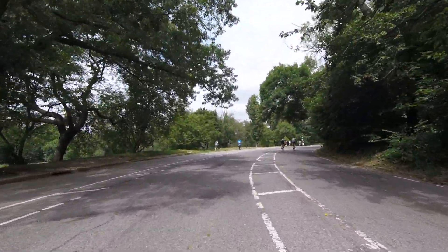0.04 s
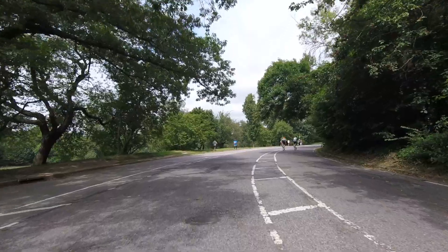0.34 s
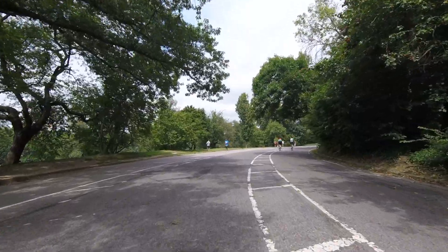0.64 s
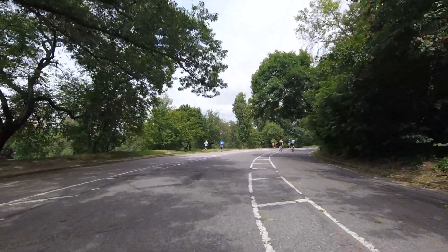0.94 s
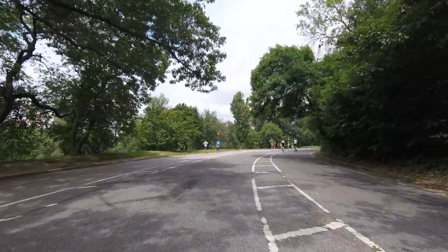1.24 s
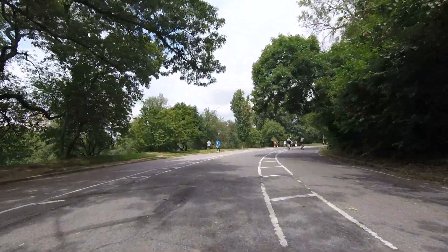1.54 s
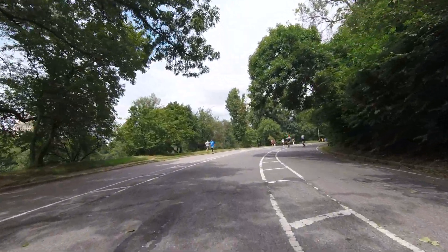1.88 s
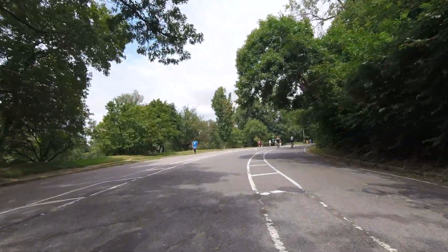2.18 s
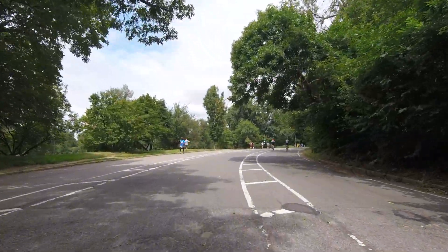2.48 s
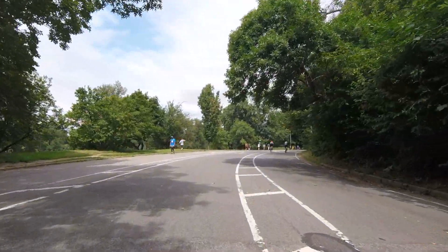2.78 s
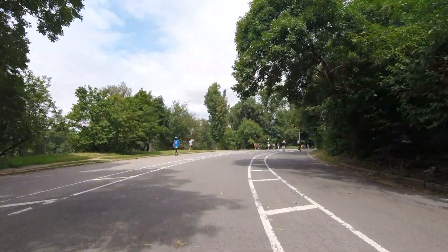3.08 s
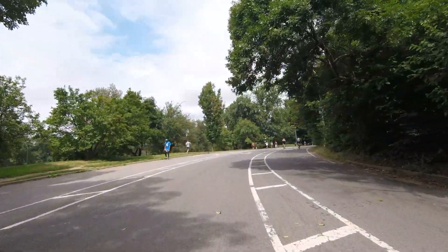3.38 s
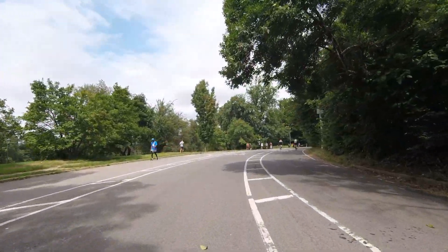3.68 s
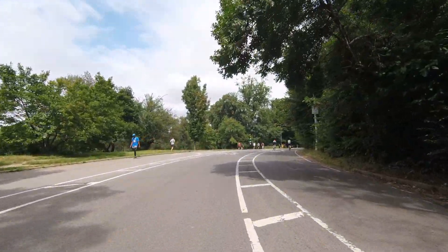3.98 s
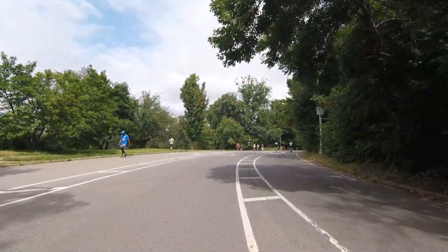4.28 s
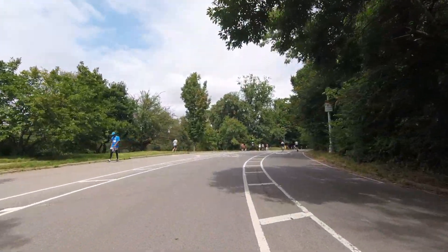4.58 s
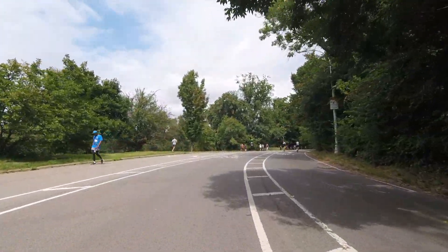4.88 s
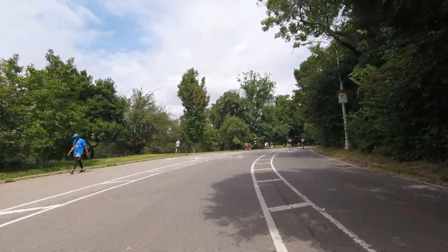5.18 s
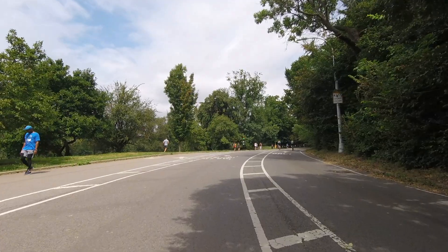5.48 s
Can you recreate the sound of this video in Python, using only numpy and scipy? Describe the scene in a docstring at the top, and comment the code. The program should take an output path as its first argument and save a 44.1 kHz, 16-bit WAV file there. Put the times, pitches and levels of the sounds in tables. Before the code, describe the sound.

Wind buffets the microphone on a moving bicycle in a loud, steady rumble, with rolling tyres and a few light knocks and rattles.

```python
"""A camera rides on a bicycle along a park road. From the start, wind buffets the microphone and sheds a
wavering hum, the road makes the mount drone, the tyres rush and the drive train whirrs in faint swells.
After a second a rough patch sets the housing ticking and the mount knocking; the treble dips briefly
after the hardest knock. Near three seconds a denser rattle ends in a deep bump, then the knocks thin out.
Throughout, a limiter holds the loud rumble steady."""
import sys
import numpy as np
from scipy import signal
from scipy.fft import rfft, irfft
from scipy.io import wavfile
from scipy.ndimage import uniform_filter1d

SR = 44100
rng = np.random.default_rng(int(sys.argv[2]) if len(sys.argv) > 2 else 0)


def int16_out(signal):
    """Quantize to a 16-bit WAV file."""
    q = np.round(np.clip(np.atleast_2d(signal).T, -1, 1) * 32767)
    wavfile.write(sys.argv[1], SR, q.astype(np.int16))


N = 244314


def from_db(db):
    """Decibels to amplitude ratio."""
    return 10 ** (np.asarray(db) / 20)


def rms_one(x):
    """Normalisation to unit power."""
    return x / np.sqrt(np.mean(x ** 2) + 1e-20)


def decay(t, t60_s):
    """Exponential damping: 60 dB down after t60_s."""
    return np.exp(-np.log(1000) * t / t60_s)


def in_time(rows):
    """Linear interpolation of each column of a time curve, at every sample."""
    times, *columns = np.transpose(rows)
    return [np.interp(np.arange(N) / SR, times, column) for column in columns]


def drift(rate_hz):
    """Low-passed noise: a smooth random fluctuation with a spread of 1."""
    hop, settle = 40, 2000
    pole = np.exp(-2 * np.pi * rate_hz * hop / SR)
    noise = rng.standard_normal(N // hop + settle + 2)
    slow = signal.lfilter([1], [1, -2 * pole, pole * pole], noise)[settle:]
    return np.interp(np.arange(N) / hop, np.arange(len(slow)), rms_one(slow))


def coloured(colour):
    """Spectral shaping: steady noise with the given spectrum, at unit power."""
    hz, db = np.transpose(colour)
    bins = np.maximum(np.arange(N // 2 + 1) * SR / N, 1)
    gain = from_db(np.interp(np.log(bins), np.log(hz), db))
    gain *= np.minimum(bins / hz[0], 1) ** 2 * np.minimum(hz[-1] / bins, 1) ** 2   # skirts at both ends
    return rms_one(irfft(rfft(rng.standard_normal(N)) * gain, N))


def resonate(x, hz, width_hz):
    """Two identical resonators in cascade, for steep skirts."""
    r = np.exp(-np.pi * width_hz / SR)
    section = [1 - r, 0, r - 1, 1, -2 * r * np.cos(2 * np.pi * hz / SR), r * r]
    return signal.sosfilt([section, section], x + 1e-18)


def shaken(modes):
    """Random excitation: modes kept ringing by noise, at unit power."""
    return rms_one(sum(from_db(db) * rms_one(resonate(rng.standard_normal(N), hz, width))
                       for hz, width, db in modes))


def steadied(x, span_s):
    """Division by the running RMS evens out slow swells and keeps the fast flutter."""
    power = uniform_filter1d(x ** 2, max(int(span_s * SR), 2))
    return x / np.sqrt(np.abs(power) + 1e-9)


def add(track, start_s, sound):
    """Superposition of a short sound on a track."""
    at = int(start_s * SR)
    track[at:at + len(sound)] += sound[:N - at]


# Resonances of the drive train: pitch_hz, width_hz, level_db
DRIVE_MODES = [(2750, 500, -4), (3380, 460, -2.5), (4440, 420, -8), (4960, 360, -8), (6400, 380, -9),
               (6950, 400, -12)]
# Its swells: middle_s, length_s, level_db, pitch_ratio, tilt_db_per_octave, sing_hz, sing_db
DRIVE_SWELLS = [(0.141, 0.51, -53.5, 0.96, -1.5, 4500, -62.5), (1.92, 0.56, -62.5, 0.95, -1.5, 5150, -73),
                (2.882, 0.4, -64.5, 1.0, 4.5, 4950, -70.5), (3.699, 0.8, -63, 1.06, -3.5, 3445, -71),
                (4.68, 0.61, -67, 1.6, -0.5, 2896, -60.5), (5.369, 0.56, -61, 1.0, 0.5, 3460, -59)]
def drive_train(idle_db, rough_db, sing_width_hz, sag_hz_per_s):
    """Forced resonance: chain and sprockets ring in swells; in each, one narrow band sings and sinks."""
    t = np.arange(N) / SR
    lowest_hz = DRIVE_MODES[0][0]
    whirr = from_db(idle_db) * shaken(DRIVE_MODES)
    for middle_s, length_s, db, ratio, tilt, sing_hz, sing_db in DRIVE_SWELLS:
        modes = [(hz * ratio, width, mode_db + tilt * np.log2(hz / lowest_hz))
                 for hz, width, mode_db in DRIVE_MODES]
        swell = np.exp(-np.pi ** 2 * ((t - middle_s) / length_s) ** 2)
        phase = 2 * np.pi * np.cumsum(sing_hz - sag_hz_per_s * (t - middle_s)) / SR
        sing = drift(sing_width_hz / 2) * np.cos(phase) + drift(sing_width_hz / 2) * np.sin(phase)
        whirr += swell * (from_db(db) * shaken(modes) + from_db(sing_db) * sing)
    return whirr * from_db(rough_db * drift(90))


# Spectrum of air grazing the microphone port: frequency_hz, density_db
SKIM_SPECTRUM = [(700, -8), (950, 3.5), (1120, -3), (1330, -5), (1550, -18.5), (1900, -25), (2600, -39)]
def air_skim(level_db, rough_db, surge_db, follows):
    """Grazing-flow turbulence: a fluttering rush at the port that grows with the pace of the ride."""
    skim_db = level_db + follows * rolling_swing_db()
    return coloured(SKIM_SPECTRUM) * from_db(skim_db + rough_db * drift(80) + surge_db * drift(1.0))


# Loudness of the rolling tyres: time_s, level_db
ROLLING_LEVEL = [(0.0, -22.5), (0.45, -25.5), (1.25, -25.5), (1.6, -27), (1.9, -31), (2.3, -28.5),
                 (2.5, -29), (3.1, -24), (3.72, -27.5), (3.95, -25.5), (4.15, -27), (4.7, -23), (4.98, -26),
                 (5.25, -22), (5.54, -27)]
# Spectra of their rush and their hiss: frequency_hz, density_db
RUSH_SPECTRUM = [(250, -13), (400, 3.5), (520, 1), (690, 4), (860, -0.5), (1100, -17.5), (1500, -30.5),
                 (3000, -49.5), (5000, -65.5)]
HISS_SPECTRUM = [(1200, -7), (2400, -4.5), (3300, 1.5), (4000, -6.5), (4900, -6.5), (5700, -11),
                 (6500, -8.5), (8000, -12), (10500, -16), (11800, -27.5), (13300, -31.5), (15000, -50)]
def tyres(rush_rough_db, hiss_db, hiss_rough_db, hiss_follows):
    """Rolling noise: a dull rush and a faint gritty hiss share one amplitude flutter."""
    roll_db, = in_time(ROLLING_LEVEL)
    flutter = drift(38)
    rush = coloured(RUSH_SPECTRUM) * from_db(roll_db + rush_rough_db * flutter)
    smooth_db = hiss_db + hiss_follows * rolling_swing_db()
    hiss = coloured(HISS_SPECTRUM) * from_db(smooth_db + hiss_rough_db * (flutter + drift(130)))
    return rush, hiss


def rolling_swing_db():
    """Level of the rolling relative to its average; other layers follow a share of it."""
    roll_db, = in_time(ROLLING_LEVEL)
    return roll_db - roll_db.mean()


# Coarse patches under the tyres: start_s, length_s, clatter_db, grit_db
COARSE_PATCHES = [(0.548, 0.11, -25, -64.5), (1.017, 0.18, -29, -55), (1.256, 0.09, -23.5, -61),
                  (2.184, 0.087, -30, -69), (2.506, 0.13, -26.5, -81), (2.655, 0.043, -25, -58),
                  (2.869, 0.13, -25.5, -63), (3.083, 0.073, -26.5, -46.5), (3.146, 0.18, -23, -46),
                  (3.422, 0.073, -22.5, -51), (4.264, 0.09, -27, -70), (4.443, 0.093, -38.5, -52),
                  (4.574, 0.071, -21, -65), (4.957, 0.063, -27.5, -58.5)]
# Spectrum of their clatter: frequency_hz, density_db
CLATTER_SPECTRUM = [(350, -0.5), (550, 7), (800, 6.5), (1150, 1.5), (1400, -11.5), (1900, -29),
                    (2800, -33.5)]
def scuffs(rough_db, grains_per_s):
    """Roughness excitation: coarse asphalt gives a dull clatter, and its grains tick in the housing."""
    clatter_gain, grit_gain = np.zeros((2, N))
    for start_s, length_s, clatter_db, grit_db in COARSE_PATCHES:
        swell = signal.windows.tukey(int(length_s * SR), .75)
        add(clatter_gain, start_s, from_db(clatter_db) * swell)
        add(grit_gain, start_s, from_db(grit_db) * swell)
    coarseness = from_db(rough_db * np.tanh(drift(130)))
    grains = (rng.random(N) < grains_per_s / SR) * rng.uniform(-1, 1, N) * coarseness
    clatter = coloured(CLATTER_SPECTRUM) * coarseness
    return clatter_gain * clatter + grit_gain * rms_one(housing(grains))


# Bumps in the road: start_s, level_db
ROAD_BUMPS = [(1.031, -7.5), (3.186, -11), (3.254, -21), (3.44, -1.5)]
def bumps(hz, t60_s):
    """Damped oscillation: each bump heaves the whole camera through a few slow swings."""
    t, thuds = np.arange(SR // 2) / SR, np.zeros(N)
    for start_s, db in ROAD_BUMPS:
        add(thuds, start_s, from_db(db) * np.sin(2 * np.pi * hz * t) * decay(t, t60_s))
    return thuds


# Resonances of the plastic housing: pitch_hz, width_hz, level_db
PLASTIC_MODES = [(2200, 2600, 8), (3370, 650, 2.5), (4160, 420, -8), (4320, 1500, -10.5), (5250, 1900, -11),
                 (5750, 410, -16), (8200, 400, -30), (10600, 370, -25)]
def housing(force):
    """Modal response of the housing, scaled so that under white noise a mode's width sets no level."""
    return sum(from_db(db) * np.sqrt(SR / width) * resonate(force, hz, width)
               for hz, width, db in PLASTIC_MODES)


# Modes of a loose metal fitting: pitch_hz, level_db, t60_s
METAL_MODES = [(2350, -9.5, 0.028), (2910, -8.5, 0.018), (3600, -1, 0.026), (4080, -5.5, 0.036),
               (4600, -9, 0.016), (5900, -10, 0.029), (6200, -14, 0.019), (8100, -24, .03),
               (10600, -27.5, .04)]
def fitting(t, spread_db=1.0, detune=0.015):
    """Free vibration of the fitting; every touch weights and tunes its modes a little differently."""
    ring = np.zeros(len(t))
    for k, (hz, db, t60_s) in enumerate(METAL_MODES):
        weakening, tuning = rng.standard_normal(2)
        tone = (-1) ** k * np.sin(2 * np.pi * hz * (1 + detune * tuning) * t)
        ring += from_db(db - spread_db * weakening) * tone * decay(t, t60_s)
    return ring


# Contacts of loose parts: start_s, level_db, snap_relative_db, crack_hz, metal_relative_db
CONTACTS = [(0.6306, -43, -38, 3500, -9), (1.029, -44, -36, 3500, -3), (1.037, -36.5, -29, 3336, 3.5),
            (1.0532, -28.5, -34, 2710, -1), (1.0698, -39.5, -26, 3590, 1), (1.0833, -45, -25, 3620, -2.5),
            (1.093, -42, -32, 3700, -4), (1.196, -36, -37, 3020, -5), (1.205, -42, -29, 4200, -7),
            (1.2512, -44.5, -34, 4230, -7), (1.2941, -18, -10.5, 2600, -11), (1.311, -39, -19.5, 2780, -6),
            (1.321, -37, -37, 2625, -4), (1.5262, -30, -20, 5300, -22), (1.593, -52, -44, 3300, -6),
            (1.701, -44, -31, 3700, -15), (1.8583, -30, -16, 5300, -29), (2.0743, -43, -28, 3900, -4),
            (2.138, -32.5, -26, 3700, -1.5), (2.1415, -36, -32, 3000, -2), (2.161, -44, -27, 3800, -9.5),
            (2.2021, -46, -30, 3580, -8), (2.239, -50, -31, 3500, 8.5), (2.364, -50, -25, 4400, -11),
            (2.6655, -38, -36, 2640, -9), (2.673, -43, -34.5, 2900, -9.5), (2.679, -34.5, -32, 3000, -8),
            (2.6914, -39, -35, 3400, -4), (2.7104, -44, -31, 3480, -5), (3.104, -28.5, -31, 3517, -2),
            (3.113, -38, -33, 4200, -6), (3.144, -28, -34, 3720, -2), (3.182, -38, -30, 4200, -7),
            (3.196, -15, -21, 3280, -5), (3.1985, -23.5, -17, 5560, -5), (3.2165, -41, -28, 4000, -2),
            (3.224, -37, -30, 3400, -2), (3.231, -38, -28, 3600, -2), (3.2615, -22, -28, 3570, -2),
            (3.2665, -32, -25, 3580, 0), (3.2795, -42, -34, 3600, -4), (3.291, -40.5, -26, 3800, 1),
            (3.328, -43, -36, 4400, -6), (3.4346, -39.5, -32, 3500, -12), (3.455, -40, -30, 3430, -8),
            (3.5184, -42.5, -34, 3530, -4), (4.147, -48, -42.5, 2300, -27),
            (4.355, -49, -36.5, 3120, -14.5), (4.465, -48, -35, 3200, -14), (4.6211, -47, -36, 3470, -8),
            (4.9728, -45, -35, 3290, -13)]
# Spectrum of a hard contact's snap: frequency_hz, density_db
SNAP_SPECTRUM = [(3500, -18.5), (5200, 2), (7000, -5), (9000, 1.5), (10600, -7.5), (12000, -9.5),
                 (14000, -2), (16000, -19.5)]
def ticks(ring_db, crack_db, snap_db, fitting_db, rise_s, t60_s, crack_width_hz, plastic_top_hz):
    """Impact excitation: a brief pitched chatter rings housing and fitting; hard contacts also snap."""
    t = np.arange(SR // 10) / SR
    contact = (1 - np.exp(-t / rise_s)) * decay(t, t60_s)
    contact /= contact.max()
    force, hard_force, crack, metal = np.zeros((4, N))
    grain, snap = rng.standard_normal(N), coloured(SNAP_SPECTRUM)
    for start_s, db, hard_db, hz, metal_db in CONTACTS:
        add(force, start_s, from_db(db) * contact)
        add(hard_force, start_s, from_db(db + hard_db) * contact)
        chatter = resonate(contact * rng.standard_normal(len(t)), hz, crack_width_hz)
        add(crack, start_s, from_db(db) * chatter / np.abs(chatter).max())
        add(metal, start_s, from_db(db + metal_db) * fitting(t))
    plastic = from_db(ring_db) * housing(force * grain) + from_db(crack_db) * crack
    plastic = signal.sosfilt(signal.butter(4, plastic_top_hz, fs=SR, output="sos"), plastic)
    return plastic + from_db(snap_db) * hard_force * snap + from_db(fitting_db) * metal


# Knocks in the clamp: start_s, level_db, pitch_hz, t60_cycles, edge_relative_db, thud_relative_db
CLAMP_KNOCKS = [(0.661, -23.5, 700, 24, -44, -16), (0.686, -20.5, 800, 24, -43.5, -14),
                (0.909, -23, 800, 22, -42, -15), (1.0295, -15, 1000, 22, -42, -11),
                (1.0375, -14, 880, 26, -35, -13), (1.0522, -5.5, 1070, 15, -22, -8),
                (1.071, -19, 990, 19, -36, -12), (1.082, -20, 1080, 20, -38, -11),
                (1.2938, -5, 850, 12, -18, 1), (1.2964, -10, 1500, 6, -18, -8),
                (1.3105, -0.5, 805, 37, -44, -12), (1.5266, 3.5, 1086, 12, -12, -0.5),
                (1.582, -16, 1176, 31, -30, -6), (1.874, -13, 853, 21, -35, -20),
                (2.137, -12, 1130, 22, -24, -6), (2.227, -17, 730, 24, -37.5, -15.5),
                (3.1065, -7.5, 905, 21, -43, -18), (3.144, -9.5, 860, 18, -42, -14),
                (3.188, -14, 700, 16, -42, -6), (3.195, -7.5, 1437, 29, -14, 2),
                (3.1973, -14, 1870, 21, -20, -6), (3.204, -5, 756, 25, -42, -4),
                (3.21, -8, 620, 13, -42, -16), (3.231, -10, 1020, 33, -40, -10),
                (3.2385, -14, 980, 25, -40, -10), (3.2495, -7.5, 885, 29, -44, -6),
                (3.2622, -9, 1050, 12, -28, -12), (3.2755, -10, 790, 20, -37, -15),
                (3.447, -17, 870, 20, -42, -20), (4.464, -18, 700, 18, -41.5, -12),
                (4.815, -12.5, 750, 40, -49, -16)]
# Modes of the clamp: pitch_ratio, level_db
CLAMP_PARTIALS = [(.65, -5.5), (1, 9), (1.45, -6.5), (1.9, -17)]
def knocks(rise_s, edge_hz, edge_t60_s, thud_hz, thud_t60_s, slack, seat_s):
    """Impact in a loose joint: a sharp edge, a tock that rises as the mount seats, a thud of the body."""
    t, out = np.arange(SR // 10) / SR, np.zeros(N)
    onset = 1 - np.exp(-t / rise_s)
    glide = 1 - slack * np.exp(-t / seat_s)   # pitch rises as the slack is taken up
    phase_per_hz = 2 * np.pi * np.cumsum(glide) / SR
    edge = onset * np.sin(2 * np.pi * edge_hz * t) * decay(t, edge_t60_s)
    thud = onset * np.sin(2 * np.pi * thud_hz * t) * decay(t, thud_t60_s)
    for start_s, db, hz, cycles, edge_db, thud_db in CLAMP_KNOCKS:
        modes = sum((-1) ** k * from_db(mode_db) * np.sin(hz * ratio * phase_per_hz)
                    for k, (ratio, mode_db) in enumerate(CLAMP_PARTIALS))
        tock = onset * decay(t, cycles / hz) * modes
        tock /= np.abs(tock).max()
        add(out, start_s, from_db(db) * (tock + from_db(edge_db) * edge + from_db(thud_db) * thud))
    return out


def treble_dip(depth_db, fall_s, hold_s, recover_s):
    """Gain envelope for the treble, which dips briefly after the hardest knock."""
    hardest_s = max(CLAMP_KNOCKS, key=lambda knock: knock[1])[0]
    corners_s = hardest_s + np.cumsum([0, fall_s, hold_s, recover_s])
    return from_db(np.interp(np.arange(N) / SR, corners_s, [0, depth_db, depth_db, 0]))


# How hard the road sways the mount: time_s, level_db
SWAY_LEVEL = [(0.0, -12), (0.25, -14), (0.6, -12), (1.3, -15), (1.7, -18.5), (1.93, -11.5), (2.12, -16),
              (2.8, -14), (3.15, -10.5), (3.55, -17.5), (4.0, -14.5), (4.8, -11.5), (5.1, -19.5),
              (5.54, -16)]
# Resonances of the mount, low sway and higher drone: pitch_hz, width_hz, level_db
MOUNT_SWAY_MODES = [(106, 27, -3.5), (150, 35, -4.5), (181.6, 43, 0)]
MOUNT_DRONE_MODES = [(236.1, 43.7, 2), (300, 45.7, -3.5), (417.5, 51, -18)]
def mount(drone_db, gust_db_per_doubling, follows, cruise_hz):
    """Forced vibration: asphalt shakes the mount, whose drone grows with the rolling and in gusts."""
    sway_db, = in_time(SWAY_LEVEL)
    shedding_hz, _ = in_time(VORTEX_HUM)
    speed_doublings = np.log2(shedding_hz / cruise_hz)   # cruise_hz is shed at the usual air speed
    swell_db = gust_db_per_doubling * speed_doublings + follows * rolling_swing_db()
    sway = from_db(sway_db) * steadied(shaken(MOUNT_SWAY_MODES), span_s=0.32)
    drone = from_db(drone_db + swell_db) * steadied(shaken(MOUNT_DRONE_MODES), span_s=0.077)
    return sway + drone


# Hum of the eddies shed by the housing: time_s, pitch_hz, level_db
VORTEX_HUM = [(0.0, 205, -12), (0.18, 214, -12.5), (0.32, 214, -16.5), (0.44, 200, -8.5), (0.6, 198, -17),
              (0.76, 238, -14.5), (0.9, 216, -17.5), (1.08, 208, -8), (1.24, 232, -14.5),
              (1.34, 245, -15.5), (1.6, 174, -16.5), (1.85, 195, -29.5), (2.02, 181.6, -15.5),
              (2.38, 193, -13.5), (2.65, 200, -17), (2.8, 160, -12.5), (2.95, 210, -19), (3.19, 243.4, -16),
              (3.37, 219, -20), (3.51, 242.4, -16), (3.65, 196, -12), (4.1, 197, -14.5), (4.3, 192, -13.5),
              (4.52, 198, -12), (4.7, 190, -17), (4.87, 206, -11.5), (5.02, 168, -11), (5.14, 194, -10.5),
              (5.26, 190, -11.5), (5.37, 207, -9.5), (5.54, 192, -11.5)]
# How hard large eddies buffet the port: time_s, level_db
BUFFET_LEVEL = [(0.0, -11), (0.52, -21.5), (0.72, -10), (0.88, -16), (1.08, -16), (1.5, -16), (1.58, -29),
                (1.7, -16.5), (2.2, -19.5), (2.8, -18.5), (3.2, -10), (3.48, -16), (3.7, -19.5), (4.2, -25),
                (4.68, -16), (5.17, -24), (5.3, -16.5), (5.54, -23)]
# Spectrum of the buffeting: frequency_hz, density_db
BUFFET_SPECTRUM = [(15, -9.5), (28, 3), (45, -4.5), (65, 4), (90, -2.5), (140, -0.5), (250, -17),
                   (500, -43)]
def wind(waver_hz, jitter_hz, flutter_db, octave_db):
    """Vortex shedding hums at a pitch proportional to air speed, while large eddies thump on the port."""
    hz, hum_db = in_time(VORTEX_HUM)
    buffet_db, = in_time(BUFFET_LEVEL)
    buffet = from_db(buffet_db) * steadied(coloured(BUFFET_SPECTRUM), span_s=0.12)
    pitch_hz = hz + waver_hz * drift(23.95) + jitter_hz * drift(96.6)
    phase = 2 * np.pi * np.cumsum(pitch_hz) / SR
    hum = rms_one(np.sin(phase) + from_db(octave_db) * np.sin(2 * phase))
    return buffet + hum * from_db(hum_db + flutter_db * drift(13.0))


def scene():
    """Superposition: airborne and structure-borne sound add at one microphone."""
    air = wind(waver_hz=9, jitter_hz=11.95, flutter_db=3.5, octave_db=-27.0)
    air += air_skim(level_db=-36, rough_db=1.7, surge_db=3.5, follows=0.87)
    rush, hiss = tyres(rush_rough_db=0.7, hiss_db=-62.5, hiss_rough_db=1.5, hiss_follows=0.68)
    road = rush + mount(drone_db=-14.5, gust_db_per_doubling=6.5, follows=0.56, cruise_hz=219)
    road += scuffs(rough_db=5, grains_per_s=810) + bumps(hz=34.5, t60_s=0.13)
    whirr = drive_train(idle_db=-75, rough_db=1.5, sing_width_hz=150, sag_hz_per_s=450)
    treble = (hiss + whirr) * treble_dip(depth_db=-19, fall_s=0.018, hold_s=0.05, recover_s=0.065)
    rattle = ticks(ring_db=-20.5, crack_db=-1.0, snap_db=3.0, fitting_db=-2.0,
                   rise_s=0.000099, t60_s=0.012, crack_width_hz=2200, plastic_top_hz=9500)
    rattle += knocks(rise_s=0.00005, edge_hz=2700, edge_t60_s=0.0027,
                     thud_hz=570, thud_t60_s=0.0072, slack=0.3, seat_s=0.00074)
    return (air + road + treble + rattle)[None]


def limiter(x, ceiling_db, release_db_per_s, attack_s):
    """Peak limiting: peaks over the ceiling pull the gain down, and it recovers at a steady rate."""
    over_db = np.maximum(20 * np.log10(np.abs(x) + 1e-9) - ceiling_db, 0)
    release_db = release_db_per_s * np.arange(N) / SR
    held_db = np.maximum.accumulate(over_db + release_db, axis=-1) - release_db
    return x * from_db(-uniform_filter1d(held_db, max(int(attack_s * SR), 2)))


def record(dry):
    """Limiting holds the rumble, the remaining peaks clip, and a low-pass filter cuts the top."""
    limited = limiter(dry, ceiling_db=-3.0, release_db_per_s=150.0, attack_s=0.0017)
    low_pass = signal.cheby2(12, 70, 16500, fs=SR, output="sos")   # 70 dB down from 16.5 kHz
    return signal.sosfilt(low_pass, np.clip(limited, -1, 1))


dry = scene()
out = record(dry)
int16_out(out)
```